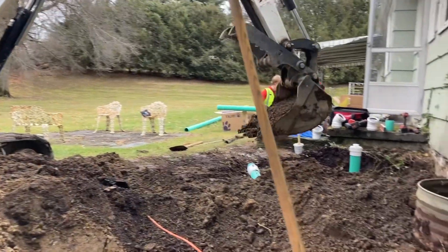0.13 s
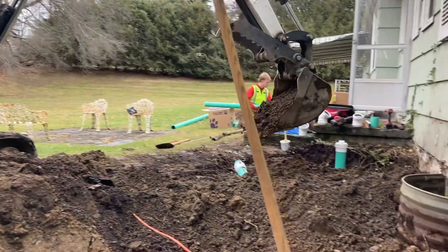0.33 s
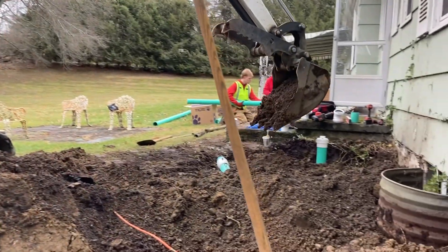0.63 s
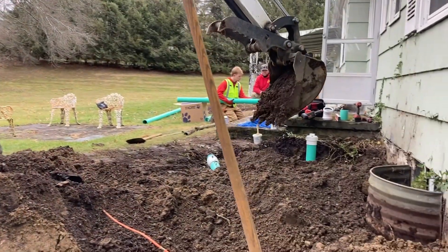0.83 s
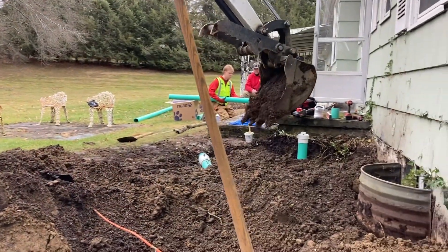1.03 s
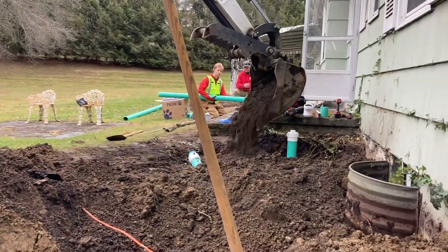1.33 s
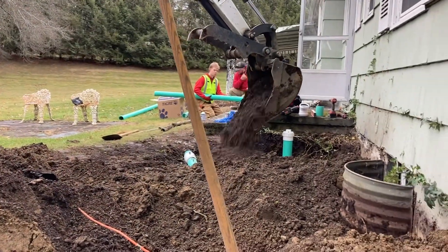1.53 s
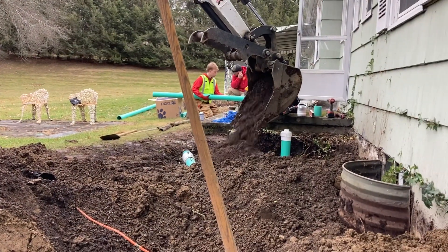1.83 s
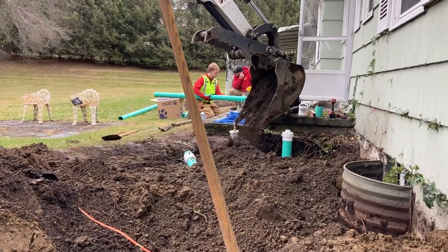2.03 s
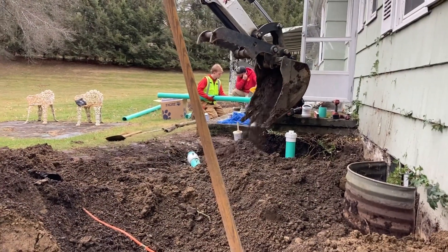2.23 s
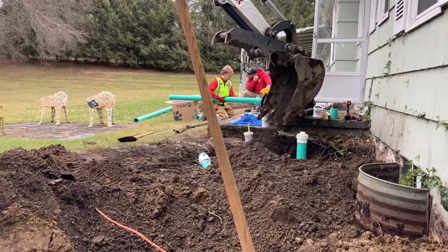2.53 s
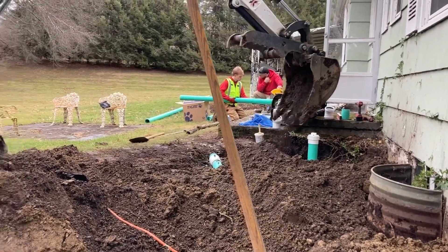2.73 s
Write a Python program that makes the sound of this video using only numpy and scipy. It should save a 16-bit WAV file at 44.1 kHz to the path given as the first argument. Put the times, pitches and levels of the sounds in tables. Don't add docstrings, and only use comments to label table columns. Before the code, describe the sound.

Continuous diesel excavator roar and low exhaust thrum, with a brief dry pin scrape early, rising pump whine, then heavier pattering dirt under a sizzling metal rattle, heard outdoors in stereo from a few metres.

```python
import sys
import numpy as np
from scipy import signal
from scipy.fft import rfft, irfft
from scipy.io import wavfile
from scipy.ndimage import uniform_filter1d, map_coordinates

SR = 44100
rng = np.random.default_rng(int(sys.argv[2]) if len(sys.argv) > 2 else 0)


def store_wav(level_fs):
    pcm = np.round(np.clip(np.atleast_2d(level_fs), -1, 1) * 32767)
    wavfile.write(sys.argv[1], SR, pcm.T.astype(np.int16))


def invert_db(level):
    return 10 ** (np.asarray(level, dtype=float) / 20)


N = 127890
TEETH, EXHAUST_BEATS = 11, 3
ENGINE_LEAD_S = 18 / SR


def curve(table, column=1):
    rows = np.array(table, float)
    return np.interp(np.arange(N) / SR, rows[:, 0], rows[:, column])


def on_log(table):
    rows = np.array(table, float)
    bins = np.fft.rfftfreq(N, 1 / SR)
    return np.interp(np.log(bins + 1), np.log(rows[:, 0]), rows[:, 1])


def unit(x):
    return x / np.sqrt(np.mean(x ** 2))


def walk(rate):
    hold = int(SR / rate)
    steps = np.repeat(rng.standard_normal(N // hold + 1), hold)
    return 1.3 * uniform_filter1d(uniform_filter1d(steps, hold), hold)[:N]


def ring(x, hz, width):
    b, a = signal.iirpeak(hz, hz / width / 1.55, SR)
    return signal.lfilter(b, a, signal.lfilter(b, a, x))


def ports(direct, others, diffuse, lead):
    share = np.clip(diffuse, 0, 1)
    turn = np.exp(.5j * np.array([lead, -lead]))
    shared = np.sqrt(1 - share) * rfft(direct) * turn
    return irfft(shared + np.sqrt(share) * rfft(others), N)


def scrape():
    centre_s, half_s, hz, level_db = .44, .06, 5500, -46
    noise = rng.standard_normal(N)
    rings = sum(ring(noise, hz * k, 90) for k in (.87, .94, 1, 1.05))
    swell = np.exp(-((np.arange(N) / SR - centre_s) / half_s) ** 2)
    return unit(rings) * invert_db(level_db) * swell


# t/s, level/dB
SOIL_FLOW = [
    (0, -51.5),
    (1.2, -43),
    (1.6, -45),
    (1.78, -39.5),
    (2.1, -40),
    (2.45, -38.5),
    (2.6, -40.5),
    (2.9, -47),
]
# f/Hz, width/Hz, level/dB
BUCKET_RINGS = [(1241, 40, -9), (1430, 45, -10), (1680, 55, -9), (1908, 50, -12), (2602, 60, -13)]


def soil():
    crumbs_per_s, spread_db = 3000, 2
    thud_hz, thud_width_hz = 1380, 950
    size = invert_db(spread_db * np.minimum(rng.exponential(size=(2, N)), 2))
    ticks = (rng.random((2, N)) < crumbs_per_s / SR) * size
    ticks = ticks * np.sign(rng.standard_normal((2, N)))
    ticks = ticks + 0.38 * ticks[::-1]
    steel = sum(unit(ring(ticks, hz, width)) * invert_db(db + 3 * np.tanh(walk(8)))
                for hz, width, db in BUCKET_RINGS)
    return (unit(ring(ticks, thud_hz, thud_width_hz)) + steel) * invert_db(curve(SOIL_FLOW) - 2)


def turns(likeness, steps):
    rows = rng.standard_normal((len(likeness), steps))
    out = [rows[0]]
    for row, like in zip(rows[1:], np.clip(likeness[1:], 0, .95)):
        out.append(like * out[-1] + np.sqrt(1 - like ** 2) * row)
    return np.concatenate(out)


# t/s, rate/Hz, level/dB, likeness of one turn to the next/0-1
BUZZ_COURSE = [(0, 57, -53.5, 0), (.04, 56.2, -38, 0.3), (.13, 56, -42, 0.87), (.43, 57.56, -34.5, 0.4),
               (.56, 58, -41.5, 0.8), (.63, 60.3, -35.5, 0.8), (.76, 60.1, -43, 0.5),
               (.9, 59.83, -39, 0.85), (1.07, 60.3, -38.5, 0.61), (1.25, 60.7, -39.5, 0.66),
               (1.55, 61.06, -38.5, 0.73), (1.75, 61.54, -36, 0.63), (2.0, 61.7, -36, 0.64),
               (2.3, 62.1, -35, 0.87), (2.45, 62.5, -34.5, .7), (2.6, 62.5, -35.5, 0.83),
               (2.8, 62.95, -34, 0.8), (2.9, 63.4, -33, 0.6)]
# f/Hz, level/dB per Hz
BUZZ_COLOUR_DB = [(2500, -20.5), (4500, -6.5), (6200, -5), (7100, -3.5), (8600, -1.5), (11000, -2.5),
                  (13800, -12), (15600, -20)]
# f/Hz, unrelated share/0-1
BUZZ_WIDTH = [(3000, .7), (5500, .5), (7000, .12), (9000, .04), (15000, .05)]
# t/s, f/Hz, lift/dB
COVER_RING = [(0, 7000, 1.5), (.3, 7500, 0.5), (.45, 7950, 5), (.62, 7000, 3.5), (1.25, 7300, -1.5),
              (1.57, 7200, 3), (1.72, 7740, 7.5), (1.85, 6700, 4), (2.15, 7000, 6), (2.3, 7480, 6.5),
              (2.55, 7210, 4), (2.7, 7450, -3), (2.9, 7680, 4.5)]


def buzz():
    steps, lag_s, in_step_hz = 710, 10.3 / SR, 11400
    throb, ripple = .36, 0.067
    cover_width_hz, patchy_db, gain_db, flutter_db = 400, 2.5, 3, 1.0
    turn = np.cumsum(curve(BUZZ_COURSE)) / SR
    likeness = np.interp(np.arange(200), turn, curve(BUZZ_COURSE, column=3))
    gate = 1 + throb * np.cos(2 * np.pi * turn + 0.35 * walk(5.033))
    gate = gate * (1 + ripple * np.cos(8 * np.pi * turn))
    hiss = [map_coordinates(turns(likeness, steps), [turn * steps], order=5) * gate for _ in range(3)]
    lead = 2 * np.pi * (in_step_hz - np.fft.rfftfreq(N, 1 / SR)) * lag_s
    both = ports(hiss[0], np.array(hiss[1:]), on_log(BUZZ_WIDTH), lead)
    centre, lift_db = curve(COVER_RING), curve(COVER_RING, column=2)
    rattle = 0
    for k, hz in enumerate(3400 * 1.035 ** np.arange(46)):
        lift = lift_db / (1 + ((hz - centre) / cover_width_hz) ** 2)
        level = invert_db(patchy_db * np.tanh(walk(14)) + lift)
        rattle = rattle + (-1) ** k * ring(both, hz, hz / 28) * level
    rattle = unit(irfft(rfft(rattle) * invert_db(on_log(BUZZ_COLOUR_DB)), N))
    return rattle * invert_db(curve(BUZZ_COURSE, column=2) + gain_db + flutter_db * walk(25.02))


def clatter(gas):
    pitches = 750 * 1.065 ** (np.arange(28) + .3 * rng.standard_normal(28))
    return unit(sum(ring(gas, hz, hz / 45) * invert_db(8 * np.tanh(walk(7))) * (hz / 1000) ** -.8
                    for hz in pitches))


def thrum(shaft):
    phase = 2 * np.pi * EXHAUST_BEATS * shaft + 0.44 * walk(9.16)
    beat = np.sqrt(2) * np.sin(phase) * invert_db(-34 + walk(14))
    rumble = invert_db(-36) * unit(ring(rng.standard_normal(N), 78.4, 15.6))
    return (beat + rumble) * invert_db(np.array([[-.8], [.8]]))


# f/Hz, width/Hz, left level/dB, right level/dB
BODY_RINGS = [(58, 18, -43.5, -40.5), (138.4, 76, -36.5, -42.5), (209, 32, -42.5, -56),
              (238.7, 71, -33.5, -32), (349.6, 50, -50, -38), (414, 69, -33.5, -37.5), (621, 106, -37, -38),
              (686.7, 92, -35, -44.5), (817, 242, -39.5, -46), (897, 170, -44, -49.5),
              (1152, 228, -41.5, -47.5), (1417, 120, -45, -48), (1795, 830, -41.5, -50),
              (2630, 780, -48, -53)]
# f/Hz, level/dB per Hz
ROAR_COLOUR = [(25, -22), (45, -1.5), (110, -3), (330, 1), (520, -9.5), (1000, -12), (3500, -22.5),
               (7000, -25)]
# f/Hz, unrelated share/0-1
ENGINE_WIDTH = [(60, 0.06), (300, 0), (600, 0.26), (1500, 0.29), (3000, 0.43), (5000, 0.46)]


def engine(shaft):
    knock_share, flicker_db = 0.015, 1.15
    wall_s, wall_db = .0044, -19
    roar_db, clatter_db = -31.5, -42
    lead = 2 * np.pi * np.fft.rfftfreq(N, 1 / SR) * ENGINE_LEAD_S
    knock = 1 + knock_share * unit(np.exp(-(shaft * EXHAUST_BEATS / 2 % 1) * 4) - .25)
    gas = ports(rng.standard_normal(N), rng.standard_normal((2, N)), on_log(ENGINE_WIDTH), lead) * knock
    echo = np.roll(gas, int(wall_s * SR), axis=1) * np.array([[1], [.5]])
    gas = gas + invert_db(wall_db) * echo
    roar = unit(irfft(rfft(gas) * invert_db(on_log(ROAR_COLOUR)), N))
    out = invert_db(roar_db) * roar + invert_db(clatter_db) * clatter(gas)
    for hz, width, left_db, right_db in BODY_RINGS:
        level_db = np.array([[left_db], [right_db]]) + flicker_db * walk(6.68)
        out = out + unit(ring(gas, hz, width)) * invert_db(level_db)
    return out + thrum(shaft)


# t/s, tooth rate/Hz, level/dB
PUMP_SONG = [(0, 287.8, -32), (.6, 286.1, -31.5), (.74, 287.2, -33), (.85, 294, -28.5), (.95, 297.8, -28),
             (1.25, 297.1, -28), (1.7, 300.1, -26.5), (2.55, 296.6, -26), (2.78, 292.8, -25),
             (2.9, 288, -27.5)]
# multiple of tooth rate, left level/dB, right level/dB
PUMP_PARTIALS = [(1, -3, 3), (2, -21, -17), (3, -25, -27)]


def pump(shaft):
    smear = .7
    late = np.array([[0], [ENGINE_LEAD_S]]) * curve(PUMP_SONG)
    tones = 0
    for k, left_db, right_db in PUMP_PARTIALS:
        phase = 2 * np.pi * k * (TEETH * shaft - late) + smear * (k - 1) * walk(25)
        level_db = np.array([[left_db], [right_db]]) + 1.1 * k * walk(14)
        tones = tones + np.sin(phase) * invert_db(level_db)
    return np.sqrt(2) * tones * invert_db(curve(PUMP_SONG, column=2))


# t/s, level/dB
CLOSENESS = [
    (0, -2),
    (.7, -1),
    (1.4, -0.5),
    (2.1, 0.5),
    (2.9, 1),
]


def scene():
    shaft = np.cumsum(curve(PUMP_SONG) / TEETH) / SR
    return engine(shaft) * invert_db(curve(CLOSENESS)) + pump(shaft) + buzz() + soil() + scrape()


# f/Hz, silencing depth under the other of mid and side/dB, dropped share/0-1
THINNING = [(3000, 17, 0), (5000, 12, 0), (7200, 10, 0), (8500, 5, 0), (9500, 7.5, 0), (11500, 6.5, 0),
            (12600, 3, .04), (13600, 1.5, .06), (14200, -1, .1), (14700, 0, .45), (15200, 3, .15),
            (15800, 3, .3)]


def steer(x):
    hop, band, grid = 1024, 16, 800
    top_hz, side_top_hz = 15890, 15160
    waver_db, side_drop, hole_share = 1.2, .4, .13
    pad = 2 * hop - grid
    pair = np.pad([x[0] + x[1], x[0] - x[1]], ((0, 0), (pad, 2 * hop - (N + pad) % hop)))
    n = np.arange(2 * hop) + .5
    hz = (np.arange(hop) + .5) * SR / 2 / hop
    window = np.sin(np.pi * n / 2 / hop)[:, None]
    basis = window * np.cos(2 * np.pi / SR * np.outer(n + hop / 2, hz)) * np.sqrt(2 / hop)
    halves = pair.reshape(2, -1, hop)
    lines = np.concatenate([halves[:, :-1], halves[:, 1:]], axis=2) @ basis
    shape = lines.shape[:2] + (hop // band,)
    power = uniform_filter1d(np.mean(lines.reshape(*shape, band) ** 2, axis=3), size=3, axis=1)
    level_db = 10 * np.log10(power + 1e-20)
    waver = np.sqrt(3) * uniform_filter1d(rng.standard_normal(shape), size=3, axis=1)
    luck = np.repeat(rng.random(shape), 3, axis=1)[:, :shape[1]]
    rows, centre = np.array(THINNING), hz[band // 2::band]
    under_db, share = (np.interp(centre, rows[:, 0], rows[:, k]) for k in (1, 2))
    strong = level_db > level_db[::-1] - under_db + waver_db * waver
    lucky = luck >= share * np.array([[[1]], [[side_drop]]])
    keep = (strong & lucky) | (centre < rows[0, 0])
    holes = np.repeat(rng.random(shape) < hole_share, 3, axis=1)
    holes = np.repeat(holes, band, axis=2)[:, :shape[1]] & (np.arange(hop) % band < 7)
    keep = np.repeat(keep, band, axis=2) & ~(holes & (hz > rows[0, 0]))
    keep = keep & (hz < np.array([[[top_hz]], [[side_top_hz]]]))
    frames = (lines * keep) @ basis.T
    lapped = frames[:, 1:, :hop] + frames[:, :-1, hop:]
    mid, side = lapped.reshape(2, -1)[:, pad - hop:pad - hop + N]
    return np.array([mid + side, mid - side]) / 2


def low_pass(x):
    return signal.sosfilt(signal.butter(12, 17000, fs=SR, output="sos"), x)


def record(dry):
    mix = steer(dry)
    return low_pass(mix)


dry = scene()
out = record(dry)
store_wav(out)
```